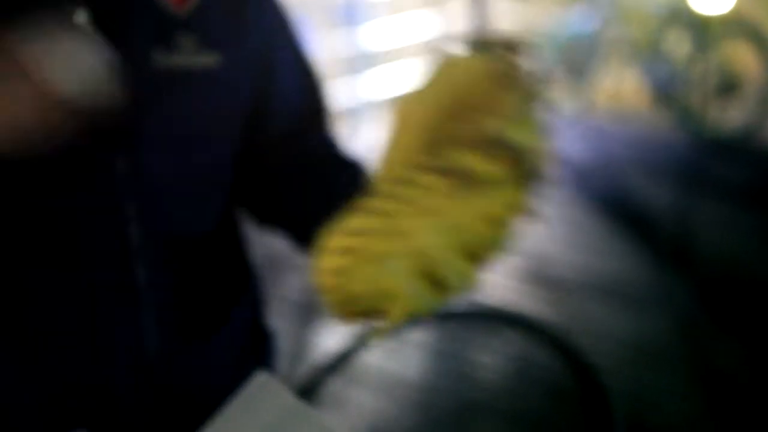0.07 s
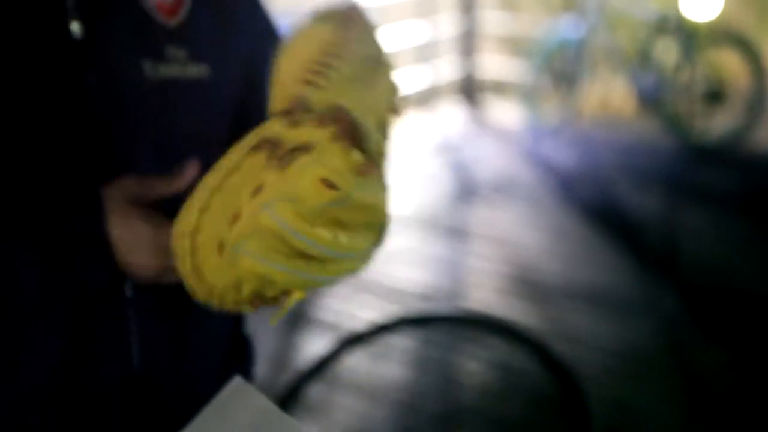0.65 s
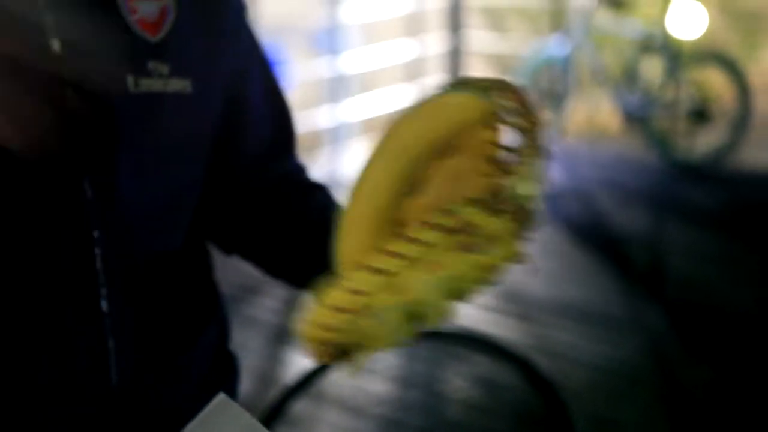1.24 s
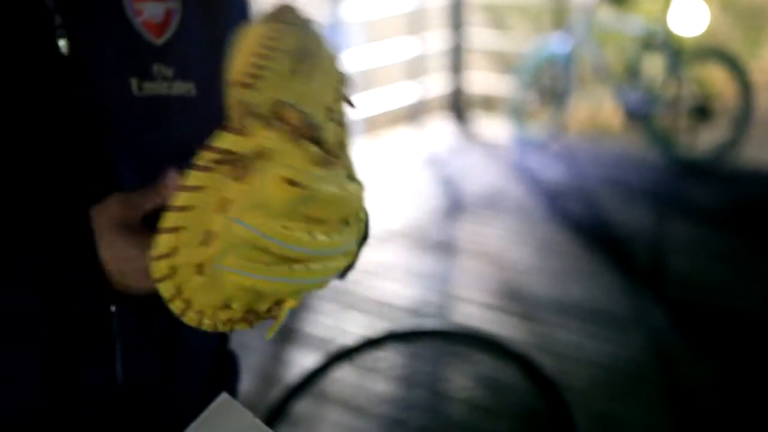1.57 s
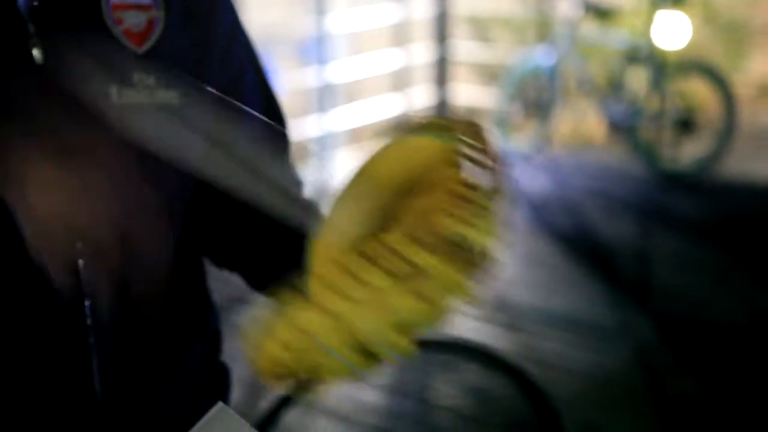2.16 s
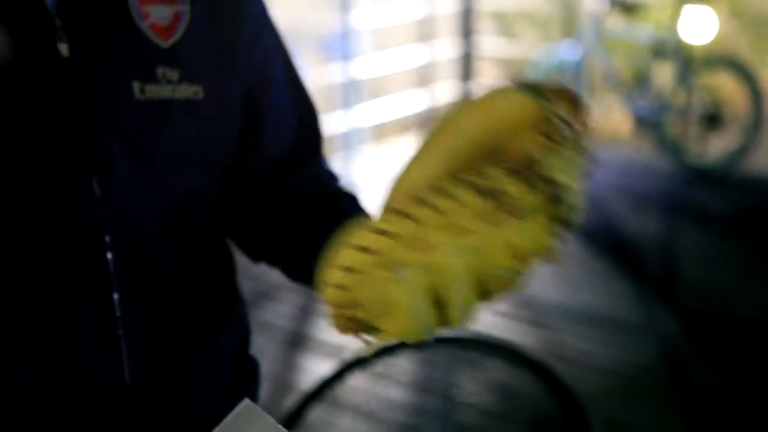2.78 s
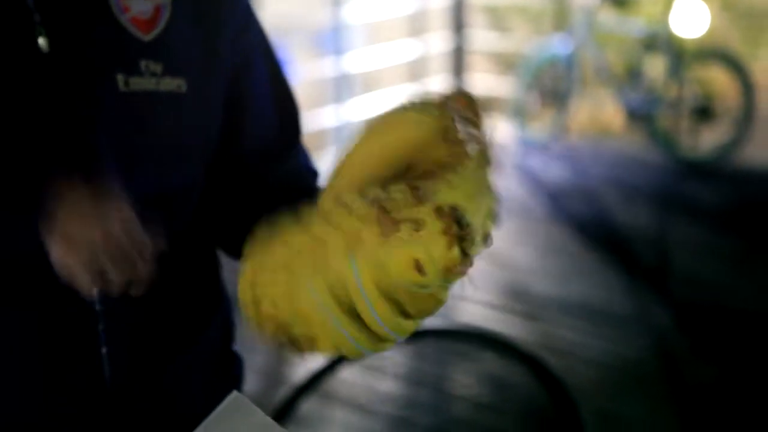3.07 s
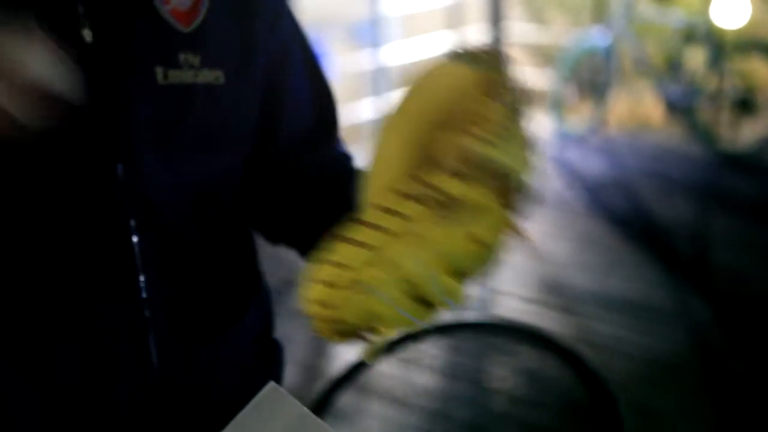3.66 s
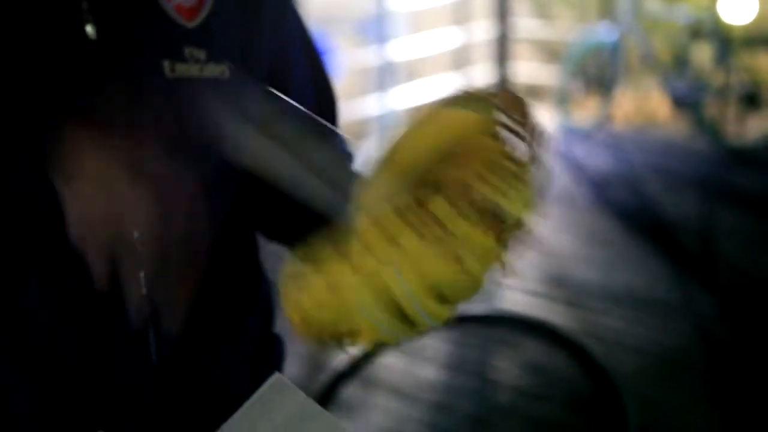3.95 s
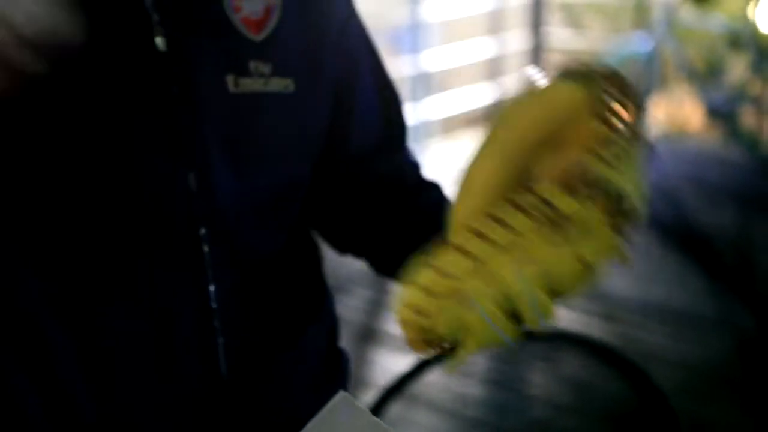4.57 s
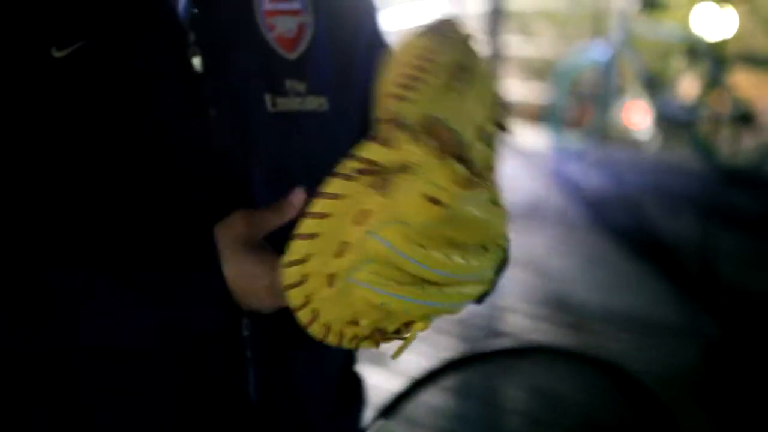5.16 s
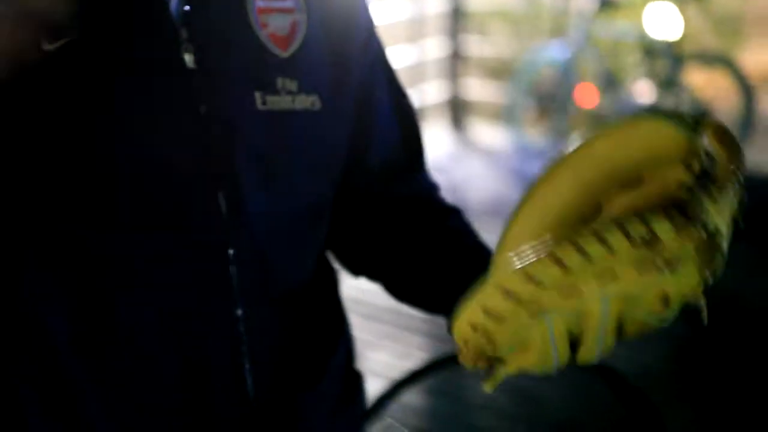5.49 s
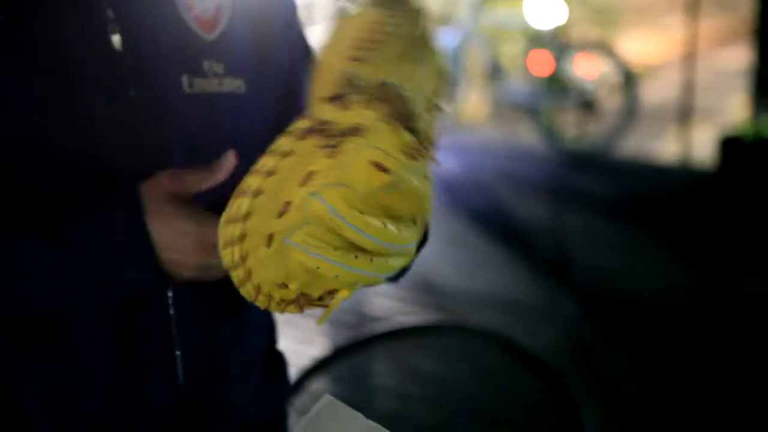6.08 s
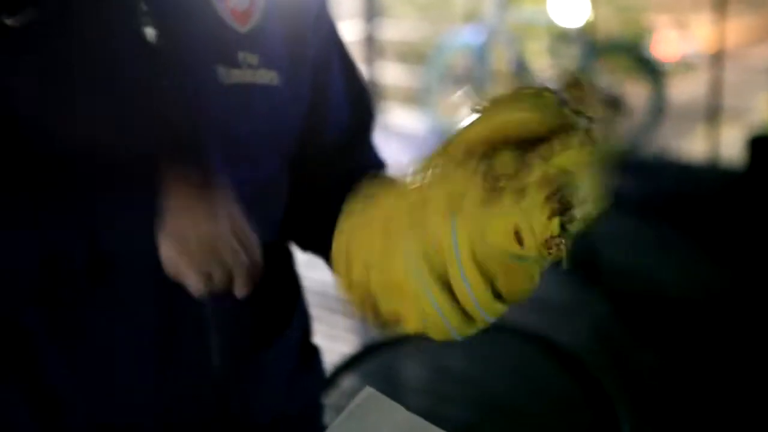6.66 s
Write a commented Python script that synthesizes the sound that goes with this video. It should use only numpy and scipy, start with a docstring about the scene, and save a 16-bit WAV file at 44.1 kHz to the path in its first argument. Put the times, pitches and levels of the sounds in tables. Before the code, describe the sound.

Faint traffic hums below a balcony throughout, with a low engine drone that swells near 1.9 and 4.6 seconds. Fingers and laces tick lightly on a ball at the start, and again around 1 and 1.8 seconds. A jacket sleeve swishes, and at 0.4 seconds the ball smacks into a leather mitt close by: a bright crack over a hollow thump, with a short echo off the walls. Seven more catches follow at about 1.3, 2.2, 3.0, 3.9, 4.8, 5.7 and 6.6 seconds, each slightly different in tone and each preceded by soft cloth swishes. On the third and seventh, the ball bumps the padded rim with a dull thud an instant before the catch. The sleeve brushes the jacket near 3.7 and 5.5 seconds. Every smack distorts slightly and pushes the traffic down, which then swells back before the next throw.

```python
"""Traffic hums below a balcony from the start, and laces and fingers tick on a ball. Then a sleeve swishes
and the ball lands in a leather mitt: the pocket thumps, the leather cracks and the walls answer.
The smack overloads the recorder, whose gain control turns the traffic down and lets it swell back.
Seven more throws follow, about 0.9 s apart; on the third and seventh of the eight,
the ball bumps the mitt's soft rim just before the catch."""
import sys
import numpy as np
from scipy import signal
from scipy.fft import irfft
from scipy.io import wavfile
from scipy.ndimage import uniform_filter1d, minimum_filter1d

SR = 44100
rng = np.random.default_rng(int(sys.argv[2]) if len(sys.argv) > 2 else 0)


def generate_wav(signal):
    """Clip the signal to [-1, 1] and save it as 16-bit WAV at the path in sys.argv[1]."""
    frames = np.transpose(np.atleast_2d(signal))
    scaled = np.clip(frames, -1, 1) * 32767
    pcm = np.round(scaled).astype(np.int16)
    wavfile.write(sys.argv[1], SR, pcm)


N = 301203
TIME = np.arange(N) / SR


def amp(db):
    """Turns decibels into a number to multiply a sound by."""
    return 10 ** (np.asarray(db) / 20)


def unit(x):
    """Scales a sound to an average strength (rms) of one."""
    return x / np.sqrt(np.mean(x ** 2) + 1e-20)


def read(points, hz):
    """Looks up a value between a table's rows, spacing frequencies by octaves."""
    f, value = np.transpose(points)
    return np.interp(np.log(hz + 1), np.log(f + 1), value)


def add(mix, s, sound):
    """Mixes a sound in, starting at s seconds."""
    part = mix[max(round(s * SR), 0):][:len(sound)]
    part += sound[:len(part)]


def noise(colour_db, size):
    """Noise of strength one; colour_db says how the frequencies compare in level."""
    hz = np.fft.rfftfreq(size, 1 / SR)
    phases = np.exp(2j * np.pi * rng.random(len(hz)))
    return unit(irfft(amp(colour_db(hz)) * phases, size))


def hump_db(hz, centre_hz, q):
    """Favours frequencies near centre_hz; a larger q makes the hump narrower."""
    ratio = (hz + 1) / centre_hz
    return -10 * np.log10(1 + (q * (ratio - 1 / ratio)) ** 2)


def swell(middle_s, half_s, db):
    """A smooth rise and fall in loudness."""
    return amp(db) * np.exp(-((TIME - middle_s) / half_s) ** 2)


# the tone colour of distant traffic: f/Hz, level/dB
TRAFFIC_COLOUR = [(20, -21), (38, -6), (60, -5), (120, -2), (215, 2.5), (320, -2), (500, -4.5), (850, 0),
                  (1250, -2.5), (1800, -8), (3000, -19), (4300, -24), (7800, -28), (10500, -45),
                  (16000, -62)]
# how loud the tyres are as time passes: t/s, level/dB
ROAR_LEVELS = [(0, -22), (1.6, -19.5), (2.5, -22), (4.6, -23.5), (6.8, -23)]
# moments when the engine pulls harder: middle t/s, half length/s, level/dB
ENGINE_PULLS = [(1.9, 0.57, -40), (3.506, .6, -44.5), (4.6, 0.38, -35.5), (6.2, .7, -44)]

def street(drone_hz=65.0, wander_hz=2.2, drone_db=-46, throb_db=2.0):
    """Tyres roar in the streets below, and a heavy engine drones on a low, wandering note."""
    wander, throb = (noise(lambda hz: -20 * np.log10(1 + (hz / 6) ** 2), N) for _ in range(2))
    roar_db = np.interp(TIME, *np.transpose(ROAR_LEVELS))
    roar = noise(lambda hz: read(TRAFFIC_COLOUR, hz), N) * amp(roar_db)
    drone = unit(np.sin(2 * np.pi * np.cumsum(drone_hz + wander_hz * wander) / SR))
    effort = amp(drone_db) + sum(swell(*pull) for pull in ENGINE_PULLS)
    return roar + drone * effort * amp(throb_db * throb)


# small ticks on the ball: t/s, level/dB, centre f/Hz
TICKS = [(0.1372, -12.5, 2390), (0.2302, -15.5, 2800), (1.0435, -27, 4960), (1.068, -24, 9500),
         (1.7555, -14.5, 3340)]

def laces(fade_s=0.014, q=0.82):
    """Laces and fingers tick on the ball. Here and below, a fade is the time to drop by 60 dB."""
    t, out = np.arange(SR // 10) / SR, np.zeros(N)
    for s, db, centre_hz in TICKS:
        tick = noise(lambda hz: read(CLOTH_COLOUR, hz) + 2 * hump_db(hz, centre_hz, q), len(t))
        add(out, s, tick * amp(db - 60 * t / fade_s) * (1 - np.exp(-t / 0.00017)))
    return out


# the tone colour of jacket cloth, also used for the ticks: f/Hz, level/dB
CLOTH_COLOUR = [(500, 11), (2500, 4), (4500, -5.5), (7500, 0.5), (10000, -10), (13000, -22), (16000, -26)]
# the arm takes the ball, then lets it fly: t/s before the catch, half length/s, added level/dB
ARM_STROKES = [(.48, 0.089, -0.5), (0.044, 0.041, 3.5)]
# the sleeve brushes the jacket on two wide wind-ups: middle t/s, level/dB
JACKET_BRUSHES = [(3.745, -37.5), (5.545, -40)]

def sleeve(grain_db=4.0, brush_half_s=0.095):
    """Cloth slides in small uneven slips as the arm makes the same two moves before each catch."""
    swing = sum(swell(s - lead_s, half_s, sleeve_db + db)
                for s, *_, sleeve_db in CATCHES for lead_s, half_s, db in ARM_STROKES)
    swing += sum(swell(s, brush_half_s, db) for s, db in JACKET_BRUSHES)
    slips = amp(grain_db * unit(uniform_filter1d(rng.standard_normal(N), size=160)))
    return swing * unit(slips * noise(lambda hz: read(CLOTH_COLOUR, hz), N))


# the notes of the pocket with the ball in it: f/Hz, level/dB, fade/s
POCKET_NOTES = [(240, -25, 0.057), (368, -19, 0.026), (546, -9, 0.017), (702, -2.5, 0.018),
                (1030, -10, 0.024), (1325, -5.5, 0.012), (2030, -19.5, 0.042), (2700, -18, 0.014)]
# the brief notes of tight leather: multiple of the crack's pitch, level/dB, fade/s
LEATHER_NOTES = [(.48, -13, 0.0059), (.63, -13.5, 0.0047), (0.998, -1.5, 0.0048), (1.15, -5, 0.0058)]
# the tone colour of leather slapping leather: f/Hz, level/dB
SLAP_COLOUR = [(200, -14), (1000, -28), (2200, -7.5), (3200, -14), (4400, -4.5), (7500, -6.5),
               (9000, -10.5), (11000, -19.5), (16000, -40)]
# one row for each catch: t/s, thump level/dB, pocket pitch multiplier, hardness/(dB per octave),
# crack level/dB, crack f/Hz, sleeve level/dB
CATCHES = [(.3710, 7.5, 1.08, 2, 9, 6500, -41), (1.2697, 12, 1.076, 0, 6, 6600, -46),
           (2.1596, 7.5, 1.04, 1.5, 9, 7590, -39.5), (3.0483, 8, 1.068, 1.5, 5.5, 5300, -43),
           (3.9414, 7.5, 1.0, -3.5, 3, 6150, -42), (4.8259, 5.5, 0.99, -2, 9, 6600, -40.5),
           (5.7040, 5, 0.97, -5, 8.5, 4380, -46), (6.6240, 7.5, 1.1, 1, 7, 6950, -46)]

def catches(crack_fade_s=0.014, air_db=-6.0, crack_q=0.54, rise_s=0.00005, contact_s=0.00093):
    """The ball makes the pocket ring; trapped air bursts out between the leather with a bright crack."""
    t, hits = np.arange(SR // 10) / SR, []
    released = np.maximum(t - contact_s, 0)  # the crack lasts while the ball sinks in, then dies
    for s, thump_db, tuning, hardness, crack_db, crack_hz, _ in CATCHES:
        # a catch on thin padding is harder and favours the higher notes
        thump = sum(amp(db + hardness * np.log2(hz / 700) - 60 * t / fade_s)
                    * np.cos(2 * np.pi * hz * tuning * t) for hz, db, fade_s in POCKET_NOTES)
        snap = sum(amp(db - 60 * t / fade_s) * np.sin(2 * np.pi * multiple * crack_hz * t)
                   for multiple, db, fade_s in LEATHER_NOTES)
        air = noise(lambda hz: read(SLAP_COLOUR, hz) + hump_db(hz, crack_hz, crack_q), len(t))
        air *= amp(air_db - 60 * released / crack_fade_s)
        smack = amp(thump_db) * thump + amp(crack_db) * (snap + air)
        hits.append((s, smack * (1 - np.exp(-t / rise_s))))
    return hits


# bounces off the nearby floor and walls: delay t/s, strength as a multiplier
ECHOES = [(.0046, .043), (.0088, 0.049), (.0122, 0.19), (.0136, 0.24), (.0225, 0.022)]

def echoes(smack, band_hz=(450, 1500)):
    """The floor and walls send back quick, hollow-sounding copies of a smack."""
    out = np.zeros(len(smack))
    for delay_s, gain in ECHOES:
        add(out, delay_s, gain * smack)
    return signal.sosfilt(signal.butter(1, band_hz, "bandpass", fs=SR, output="sos"), out)


# the sound that lingers on the balcony: f/Hz, level/dB, fade/s
BALCONY_RING = [(151, -33, .15), (700, 15.5, 0.12), (1100, 13, 0.097), (2030, -4.5, 0.17), (2960, -3, 0.15),
                (4060, -2, 0.19), (8100, -5.5, 0.19), (10400, -16.5, 0.19), (15000, -31, .16)]

def balcony(build_s=0.0053):
    """Blinds, bicycles and walls scatter a sound into a short, smooth tail (scaled to energy one)."""
    hz, t, bands = signal.stft(rng.standard_normal(SR // 2), SR, nperseg=256)
    db, fade_s = (read([(row[0], row[k]) for row in BALCONY_RING], hz)[:, None] for k in (1, 2))
    tail = signal.istft(bands * amp(db - 60 * t / fade_s), SR, nperseg=256)[1]
    tail *= 1 - np.exp(-(np.arange(len(tail)) / SR / build_s) ** 2)
    return tail / np.linalg.norm(tail)


# the notes of the padded rim: f/Hz, level/dB, fade/s
RIM_NOTES = [(200, -3, 0.073), (379, 0.5, 0.028), (623, 6.5, .015)]
# the ball touches the rim on its way in: t/s, thud level/dB, scuff level/dB
RIM_BUMPS = [(2.149, -3.5, -12), (5.6932, -6, -16.5)]

def rim_bumps(give_s=0.0025, scuff_fade_s=0.018):
    """The soft rim gives way, so its deep thud builds gently under a light scuff of leather."""
    t, hits = np.arange(SR // 10) / SR, []
    thud = sum(amp(db - 60 * t / fade_s) * np.sin(2 * np.pi * hz * t) for hz, db, fade_s in RIM_NOTES)
    thud *= 1 - np.exp(-t / give_s)
    for s, thud_db, scuff_db in RIM_BUMPS:
        scuff = noise(lambda hz: read(SLAP_COLOUR, hz), len(t)) * amp(-60 * t / scuff_fade_s)
        hits.append((s, amp(thud_db) * thud + amp(scuff_db) * scuff))
    return hits


def scene(handling_ring_db=-13, smack_ring_db=-10):
    """Ticks, swishes and smacks ring around the balcony, over the sound of the street."""
    handling = laces() + sleeve()
    mix = handling + amp(handling_ring_db) * signal.fftconvolve(handling, balcony())[:N]
    for s, smack in catches() + rim_bumps():
        add(mix, s, smack + echoes(smack))
        add(mix, s, amp(smack_ring_db) * np.linalg.norm(smack) * balcony())
    return (mix + street())[None]


def gain_control(x, threshold_db=-10.0, sense_hz=3000, attack_s=0.0046, hold_s=0.13, recover_s=0.53):
    """A burst of treble quickly turns the volume down; after a short wait it creeps back up."""
    treble = signal.sosfilt(signal.butter(2, sense_hz, "highpass", fs=SR, output="sos"), x)
    level_db = 10 * np.log10(abs(uniform_filter1d(treble ** 2, size=88)) + 1e-12)
    over_db = np.maximum(level_db - threshold_db, 0)
    decay = np.exp(-TIME / recover_s)
    recovering_db = np.maximum.accumulate(over_db / decay) * decay  # each peak dies away slowly
    half = int(hold_s * SR / 2)
    held_db = -minimum_filter1d(-recovering_db, 2 * half + 1, origin=half, mode="nearest")
    smoothing = np.exp(-1 / (attack_s * SR))
    cut_db = signal.lfilter([1 - smoothing], [1, -smoothing], held_db)
    return x * amp(-cut_db)


def record(dry, top_hz=15800):
    """The volume dips, overload flattens the start of each smack, and the highest treble is cut off."""
    ducked = gain_control(dry[0])
    clipped = ducked / (1 + ducked ** 8) ** (1 / 8)
    treble_cut = signal.firwin(255, top_hz, window=("kaiser", 8), fs=SR)
    return signal.oaconvolve(clipped, treble_cut, "same")[None]


dry = scene()
out = record(dry)
generate_wav(out)
```